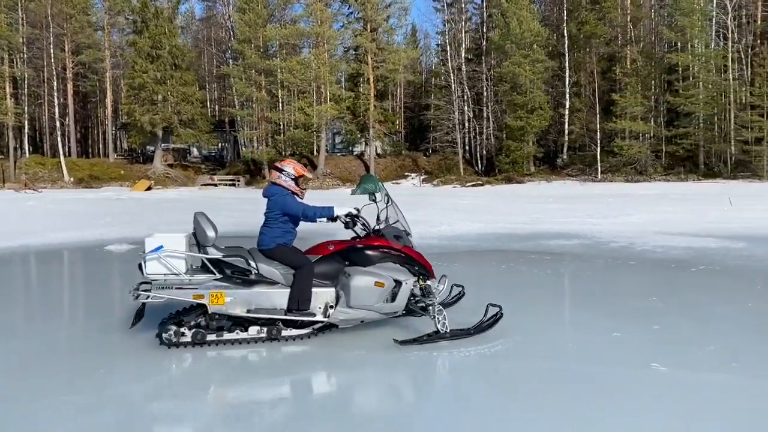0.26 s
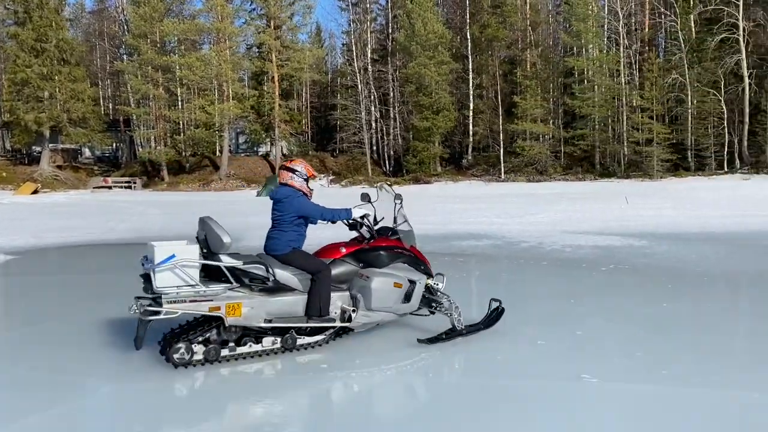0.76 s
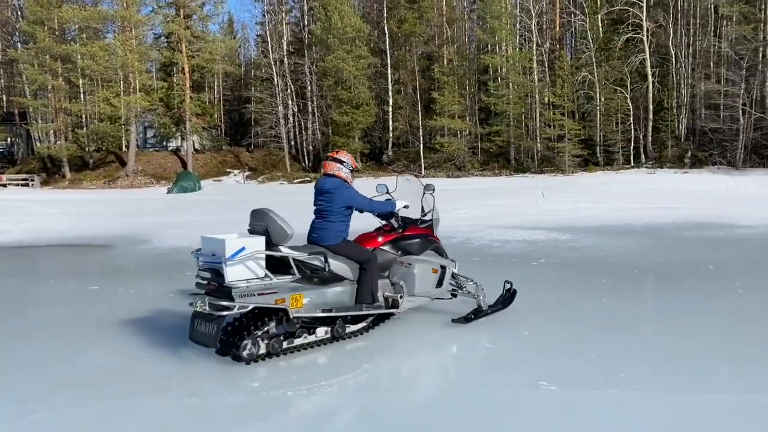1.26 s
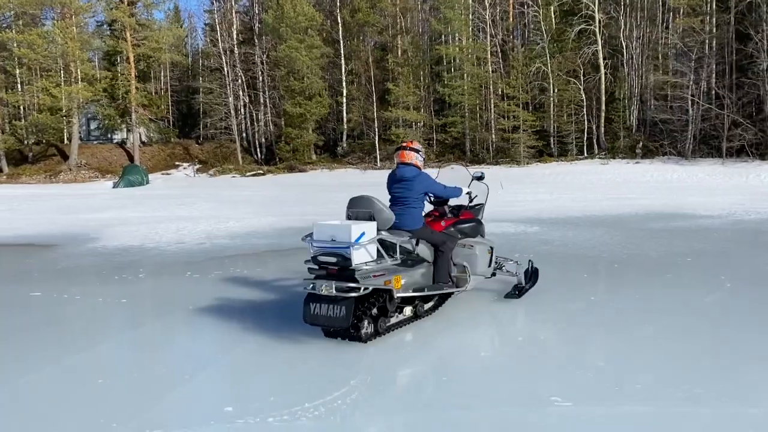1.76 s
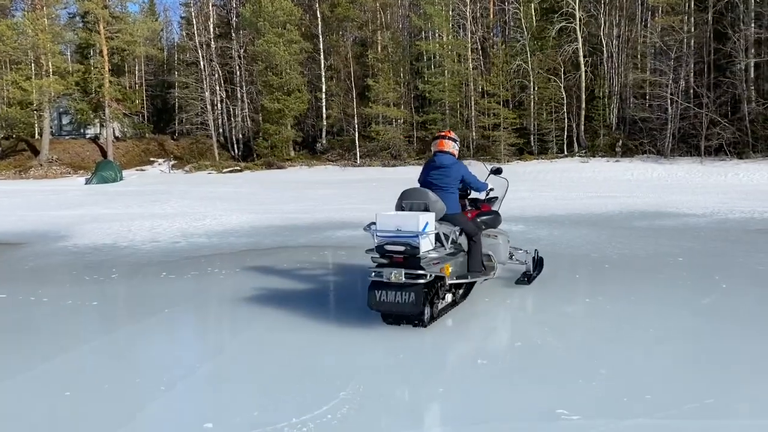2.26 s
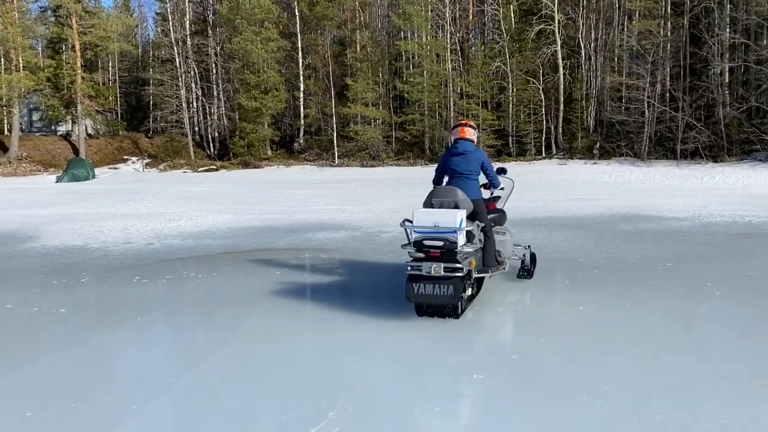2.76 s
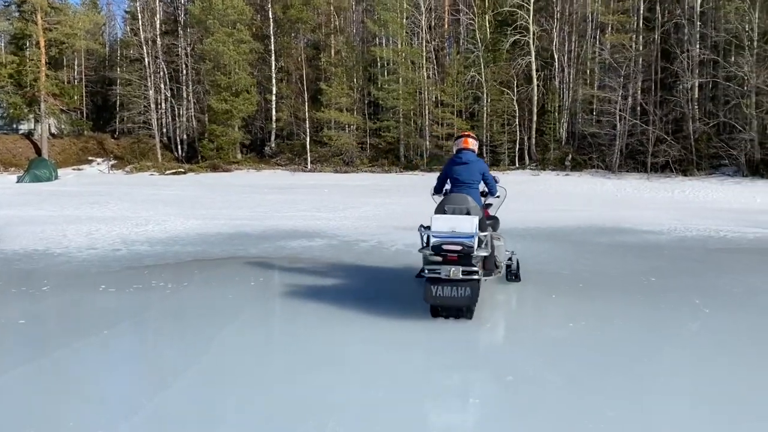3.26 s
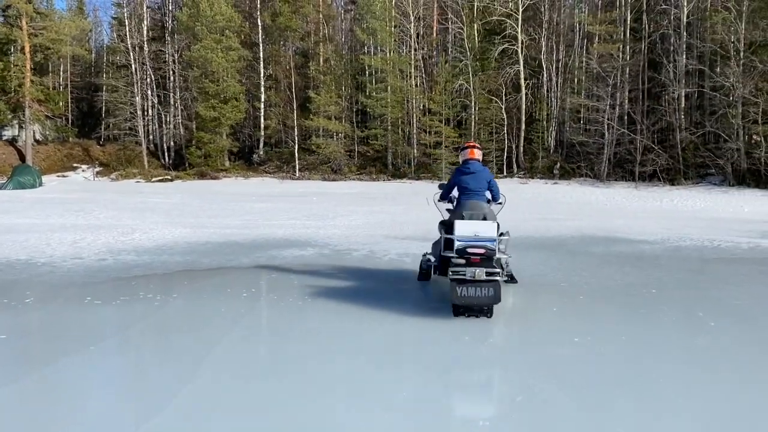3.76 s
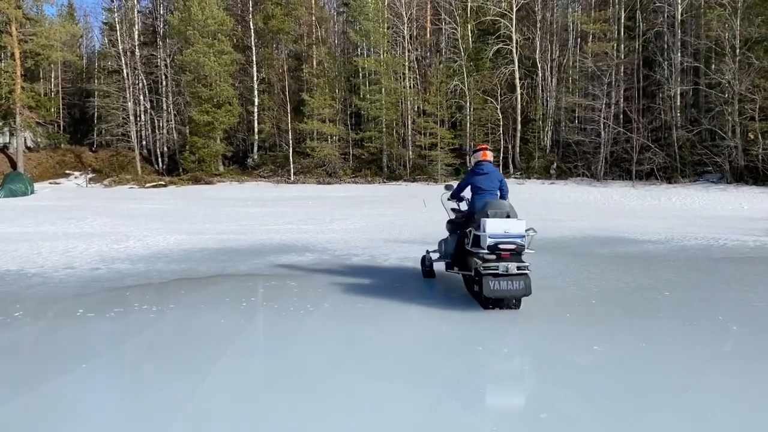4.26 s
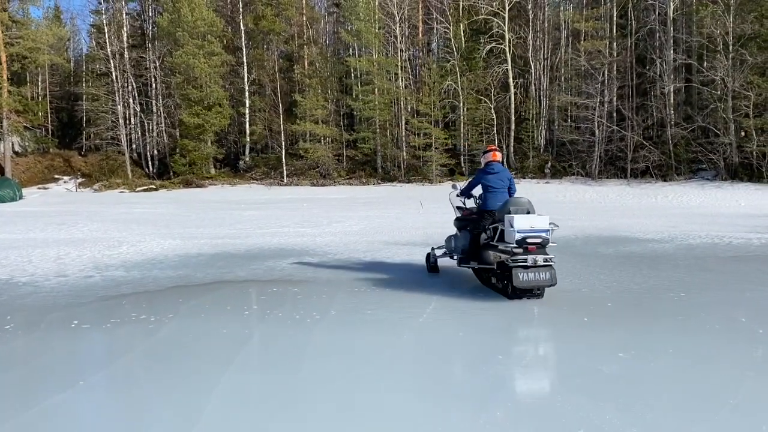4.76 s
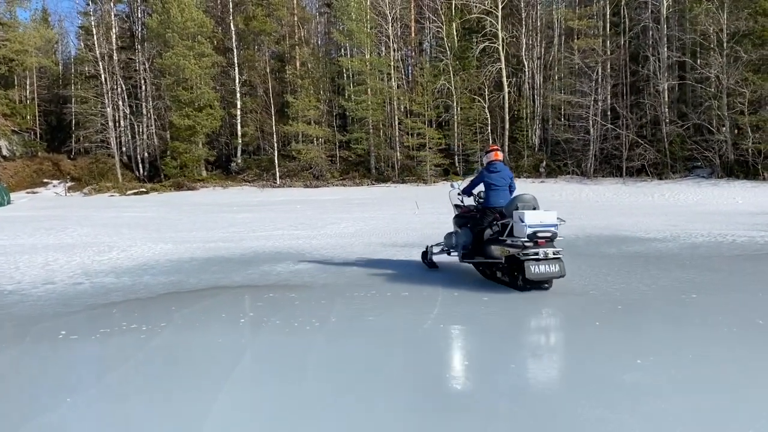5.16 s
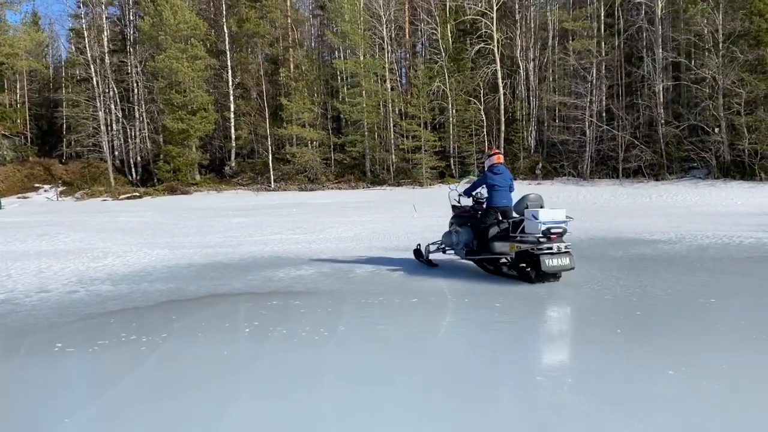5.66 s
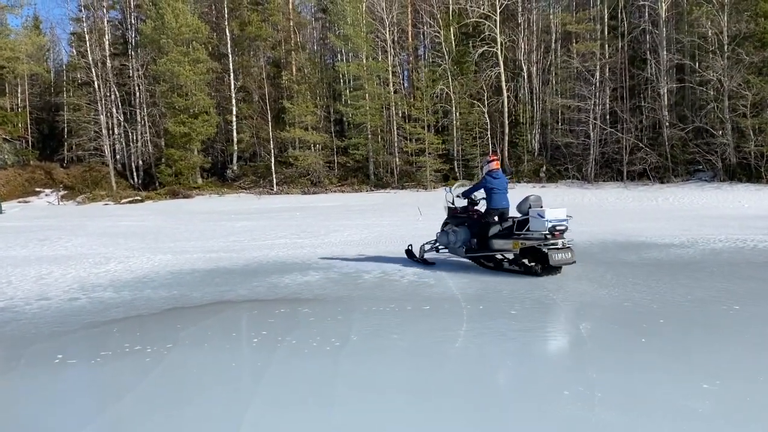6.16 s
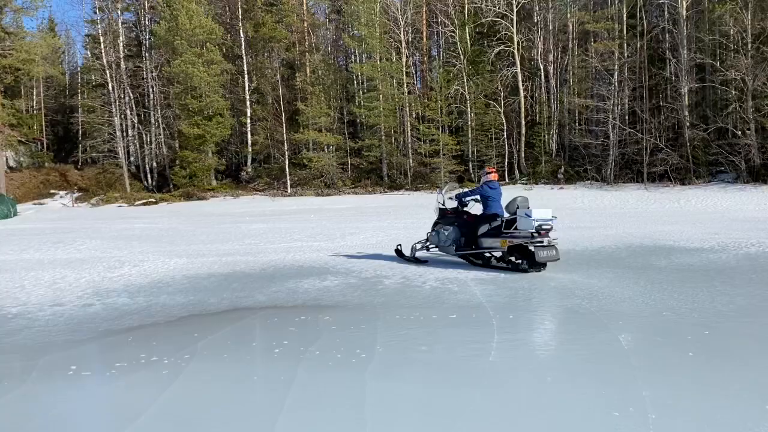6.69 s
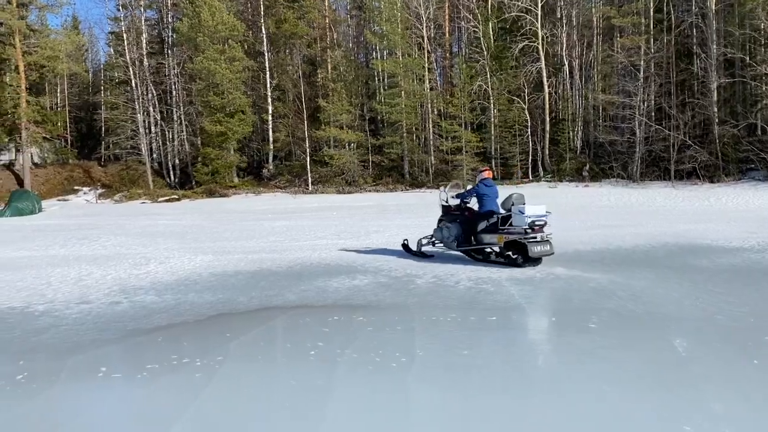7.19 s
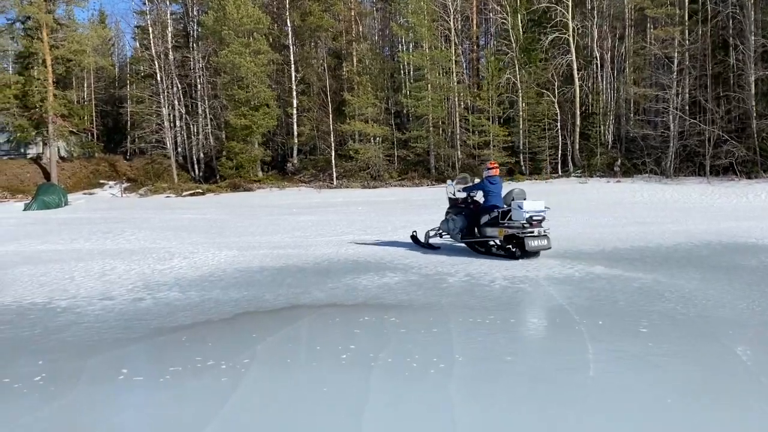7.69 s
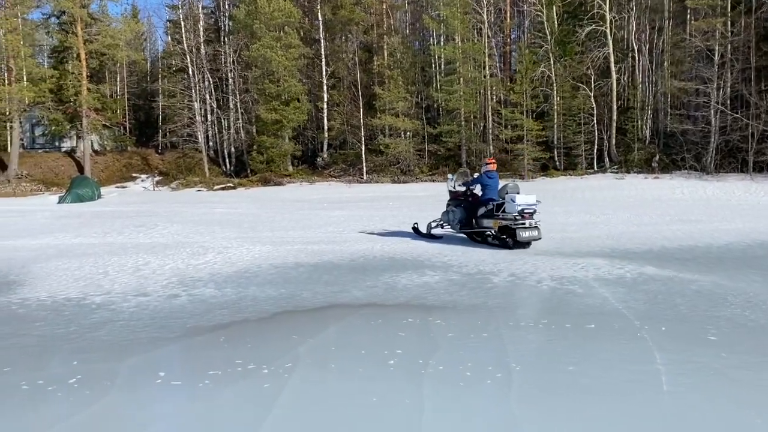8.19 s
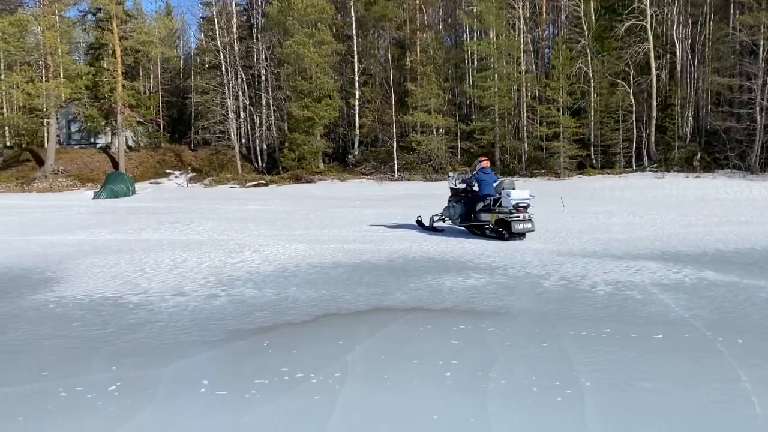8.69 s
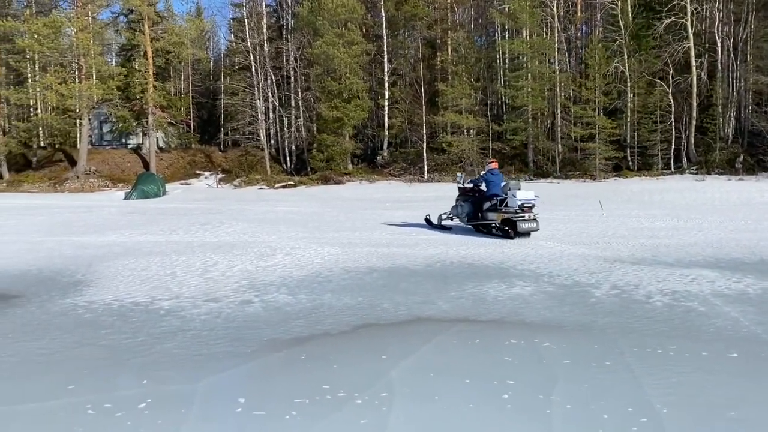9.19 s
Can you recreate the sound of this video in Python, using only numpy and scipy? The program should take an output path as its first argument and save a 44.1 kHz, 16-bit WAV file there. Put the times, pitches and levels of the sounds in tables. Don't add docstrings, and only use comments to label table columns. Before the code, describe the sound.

A snowmobile idles lumpily on lake ice, revs up, coasts down with a metallic clutch ring, revs again, then gives two short blips.

```python
import sys
import numpy as np
from scipy import signal
from scipy.fft import rfft, irfft, next_fast_len
from scipy.io import wavfile
from scipy.ndimage import uniform_filter1d, map_coordinates

SR = 44100
rng = np.random.default_rng(int(sys.argv[2]) if len(sys.argv) > 2 else 0)


def file_out(sig):
    cols = np.atleast_2d(sig).T
    lim = np.clip(cols, -1, 1)
    pcm = np.round(lim * 32767).astype(np.int16)
    wavfile.write(sys.argv[1], SR, pcm)


def voltage_ratio(level):
    return 10 ** (np.asarray(level, float) / 20)


N = 416304


def rms_one(x):
    return x / np.sqrt(np.mean(x ** 2) + 1e-20)


def in_time(rows):
    s, *columns = np.transpose(rows)
    return [np.interp(np.arange(N) / SR, s, c) for c in columns]


def by_speed(law, speed):
    rate, *columns = np.transpose(law)
    return np.array([np.interp(speed, rate, c) for c in columns])


def bumps(s, half_s, height):
    t = np.arange(N) / SR
    return sum(h * np.exp(-((t - at) / w) ** 2) for at, w, h in zip(s, half_s, height))


def at_hz(points, hz):
    f, value = np.transpose(points)
    return np.interp(np.log(hz + 1), np.log(f + 1), value)


def humps(peaks, hz):
    return sum(level_db / (1 + (2 * (hz - f) / width) ** 2) for f, width, level_db in peaks)


def shaped(x, response):
    size = next_fast_len(N + SR // 2)
    return irfft(rfft(x, size) * response(np.arange(size // 2 + 1) * SR / size), size)[..., :N]


def band(x, low_hz, high_hz, order=2):
    return signal.sosfilt(signal.butter(order, [low_hz, high_hz], "band", fs=SR, output="sos"), x)


def evened(x, span_s):
    return x / np.sqrt(uniform_filter1d(x ** 2, int(span_s * SR)) + 1e-12)


def drift(rate):
    knots = rng.standard_normal(int(N / SR * 100) + 2)
    return np.interp(np.arange(N) / SR * rate, np.arange(len(knots)), knots)


def ring(clicks, hz, t60):
    r, w = voltage_ratio(-60 / (t60 * SR)), 2 * np.pi * hz / SR
    return signal.lfilter([0, np.sin(w)], [1, -2 * r * np.cos(w), r * r], clicks + 1e-18)


# pitch_hz [Hz], level_db [dB per Hz]
WIND = [(25, -12), (50, -4), (75, 18), (105, 13), (150, 10.5), (210, 16), (290, -20), (350, -16),
        (600, -48)]


def gusts():
    noise = shaped(rng.standard_normal(N), lambda hz: voltage_ratio(at_hz(WIND, hz)))
    return evened(noise * voltage_ratio(3.3 * drift(12)), 0.33)


# start_s [s], level_db [dB]
SIDEWAYS = [(0, -28), (.6, -32), (1.2, -53), (2.6, -77), (3.6, -51), (4.0, -30), (4.6, -38), (5.3, -28),
            (5.85, -35), (6.3, -29), (7.2, -27), (7.6, -33.5), (8.2, -32), (8.75, -25), (9.44, -29)]
# start_s [s], share [0-1]
BREEZE = [(0, .15), (3.4, .2), (4.2, .6), (5.2, .85), (9.44, .9)]


def sideways(pipe):
    share, level = in_time(BREEZE)[0], voltage_ratio(in_time(SIDEWAYS)[0])
    quarter_turn = evened(shaped(pipe, lambda hz: 1j + 0 * hz), .3)
    aside = np.sqrt(1 - share ** 2) * quarter_turn
    common_wind = level * share * voltage_ratio(-3.0) * gusts()
    return common_wind + level * (share * gusts() + aside) * [[1], [-1]]


# pitch_hz [Hz], level_db [dB]
DIFFUSE = [(40, -7), (90, -16), (200, -20), (400, -9), (700, -12), (1200, -20), (3000, -11), (8000, -7),
           (13000, -6), (14800, -14)]


def tree_line_echo(x):
    t, t60 = np.arange(int(.3 * SR)) / SR, .3
    spray = rng.standard_normal(len(t)) * voltage_ratio(-60 * t / t60)
    scattered = signal.fftconvolve(x, spray / np.sqrt(np.sum(spray ** 2)))[:N]
    return shaped(scattered, lambda hz: voltage_ratio(at_hz(DIFFUSE, hz)))


# start_s [s],
# level_db [peak dB]
TICKS = [(0.5397, -56), (0.5945, -54), (0.8255, -46), (0.9632, -50), (1.3498, -56), (1.4481, -55),
         (1.4865, -45), (1.8108, -56), (2.1425, -56), (2.3161, -61), (2.7876, -58), (3.0864, -57),
         (3.1652, -42), (3.2221, -50), (5.7149, -51), (5.8611, -47), (5.8895, -42), (5.9249, -52),
         (6.2347, -50), (8.326, -39), (8.6986, -46), (8.8932, -43), (9.0748, -50)]


def ticks():
    out, t = np.zeros(N), np.arange(int(.03 * SR)) / SR
    for (s, level_db), noise in zip(TICKS, rng.standard_normal((len(TICKS), len(t)))):
        at = round(s * SR)
        out[at:at + len(t)] += voltage_ratio(level_db - 2) * noise * np.exp(-t / 0.0044)
    return band(out, 3500, 13000)


# start_s [s], level_db [peak dB], pitch_hz [Hz]
KNOCKS = [(0.012, -34, 686), (0.084, -37, 810), (0.203, -33, 600), (0.258, -30.5, 710), (0.615, -35, 865),
          (0.363, -30.5, 694), (0.466, -39, 700), (0.79, -33, 914), (1.147, -33.5, 830), (1.36, -35, 900),
          (1.407, -25.5, 862), (1.489, -35, 1445), (1.497, -28, 794), (1.819, -36.5, 860),
          (2.082, -35, 804), (2.37, -24, 753), (2.39, -31, 860), (2.413, -29, 800), (2.428, -40, 870),
          (2.796, -37.5, 794), (3.148, -44, 920), (3.302, -39, 720), (4.088, -48, 497), (4.396, -45, 666),
          (5.135, -23, 530), (5.988, -30, 730), (7.244, -28, 540), (8.508, -27, 676), (9.346, -23, 750),
          (8.549, -31, 720), (8.735, -48, 673)]


def knocks():
    out, t = np.zeros(N), np.arange(int(.04 * SR)) / SR
    for s, level_db, hz in KNOCKS:
        tone = .7 * np.sin(2 * np.pi * hz * t) * np.exp(-t / .014)
        puff = 2.0 * rng.standard_normal(len(t)) * np.exp(-t / .009)
        knock = (tone + puff) * (1 - np.exp(-t / .001))
        at = round(s * SR)
        out[at:at + len(t)] += voltage_ratio(level_db - 2.5) * knock[:N - at]
    return band(out, 500, 2000, order=3)


# start_s [s], level_db [peak dB]
CLUTCH_HITS = [
    (5.861, -42),
    (5.89, -41.5),
    (5.9249, -46),
]
# pitch_hz [Hz], level_db [dB], t60_s [s]
CLUTCH = [(4250, -1, 0.063), (4800, -6, 0.055), (6260, -15, 0.075), (7400, -12, 0.063), (8880, -12, 0.041),
          (10300, -16, 0.061), (11460, -28, 0.056)]
# start_s [s], pitch_hz [Hz], level_db [dB]
SQUEAL = [(3.25, 3900, -75), (3.36, 4200, -58), (3.55, 4620, -55), (3.68, 4450, -58), (3.8, 4200, -75),
          (5.6, 4800, -66), (5.72, 4700, -47.5), (5.85, 4400, -46), (5.93, 4000, -47), (6.0, 3750, -51),
          (6.05, 3700, -70), (6.9, 4650, -70), (7.3, 4700, -55), (8.0, 4620, -52), (8.4, 4650, -57),
          (8.7, 4800, -53), (8.9, 4750, -60), (9.0, 4700, -75)]


def clutch():
    out = np.zeros(N)
    hit_s, hit_db = np.transpose(CLUTCH_HITS)
    at = np.round(hit_s * SR).astype(int)
    for hz, level_db, t60 in CLUTCH:
        clicks = np.zeros(N)
        clicks[at] = voltage_ratio(hit_db + level_db + 6 + rng.normal(0, 1.3, len(at)))
        out += ring(clicks, hz, t60)
    hz, level_db = in_time(SQUEAL)
    width = rms_one(signal.lfilter([1], [1, -.97], rng.standard_normal(N)))
    return out + voltage_ratio(level_db) * width * np.sin(2 * np.pi * np.cumsum(hz) / SR)


# start_s [s, centre], half_s [s], level_db [dB]
JOLTS = [
    (1.378, 0.045, 8),
    (3.94, 0.13, 13),
    (5.6, 0.29, 9.5),
]
SHAKE_FADE_DB_PER_S, FADE_FROM_S = -2, 3.5


def shake(cycles, speed, level_db):
    clean = np.clip((speed - 36) / 14, 0, .9)
    hum = np.sqrt(2) * np.sin(2 * np.pi * cycles) * voltage_ratio(0.72 * drift(1.7))
    rumble = rms_one(band(rng.standard_normal(N), 42.0, 108.4))
    fade_db = SHAKE_FADE_DB_PER_S * np.maximum(np.arange(N) / SR - FADE_FROM_S, 0)
    level = voltage_ratio(level_db + fade_db + bumps(*np.transpose(JOLTS)))
    return level * (clean * hum + np.sqrt(1 - clean ** 2) * rumble)


# start_s [s, centre], half_s [s], pitch_hz [Hz], level_db [dB]
BUZZES = [(.05, 0.091, 1200, 9), (0.084, 0.068, 830, 8), (0.21, 0.065, 600, 10), (0.303, 0.17, 720, 10.5),
          (.18, 0.051, 1340, 8), (0.14, 0.23, 6400, 16), (0.636, 0.031, 900, 13), (.76, 0.036, 470, 10),
          (0.99, 0.49, 825, 7), (1.8, 1.7, 2470, 6.5), (2.04, 0.87, 1290, 11.5), (2.5, 1.1, 1670, 8),
          (2.6, .5, 3740, 8), (3.2, 0.11, 3800, 10), (3.65, 0.17, 5300, 12), (3.9, 0.11, 400, 5),
          (6.5, .15, 600, -6), (6.85, 0.11, 500, 5), (.5, 0.12, 540, 6), (3.46, 0.16, 410, -5),
          (3.75, 0.24, 4470, 14), (3.884, 0.04, 560, 10.5), (4.122, 0.14, 485, 13.5),
          (4.476, 0.084, 1680, 11.5), (5.07, 0.3, 516, 11), (5.645, .08, 440, 7), (6.3, 0.29, 990, -13),
          (6.396, 0.078, 470, 6.5), (5.4, 0.11, 430, 2), (6, 0.15, 400, 12), (8.1, 0.11, 570, 6.5),
          (7.15, .1, 640, 11.5), (7.907, 0.11, 690, 9), (8.5, 0.35, 2550, 0), (8.7, 0.6, 4050, 9),
          (8.698, 0.21, 4800, 16), (8.9, 0.05, 475, 7), (9.4, 0.062, 490, 13), (7.3, 0.22, 480, -4),
          (7.9, 0.29, 10420, 14), (7.3, .6, 4650, 5.5), (4.85, 0.22, 790, 5), (8.05, 0.13, 1100, 2),
          (6.1, 0.14, 1130, 5), (7.9, 0.044, 480, 1), (1.53, .04, 850, 14), (2.12, .02, 780, 12),
          (0.2, 0.089, 2050, 13), (.78, .05, 390, 14), (0.92, .03, 1630, 11)]
BUZZ_WIDTH_HZ = 89
TUNNEL_HZ, TUNNEL_IDLE_HZ, TUNNEL_WANDER_HZ = 450, 171, 114
BELT_HZ, BELT_SLACK_HZ = 4060, 480


def turning(x, speed, overrun):
    hz, s, frames = signal.stft(x, SR, nperseg=1024)
    at = np.minimum((s * SR).astype(int), N - 1)
    idling = np.clip((16 - speed) / 4, 0, 1)
    tunnel_hz = (TUNNEL_HZ + idling * (TUNNEL_IDLE_HZ + TUNNEL_WANDER_HZ * drift(3.1)))[at]
    belt_hz = (BELT_HZ + BELT_SLACK_HZ * overrun)[at]
    field = rng.standard_normal((90, 60))
    place = np.meshgrid(11 * np.log2(np.minimum(hz, 11000) / 150 + 1), s * 4, indexing="ij")
    hz = hz[:, None]
    patchy_db = 2.2 - .4 * (hz > 2000)
    gain_db = patchy_db * map_coordinates(field, place, order=1)
    gain_db = gain_db + humps([(tunnel_hz, 100, 2.5), (belt_hz, 300, 5)], hz)
    for when, half_s, buzz_hz, buzz_db in BUZZES:
        swell = np.exp(-((s - when) / half_s) ** 2)
        gain_db = gain_db + humps([(buzz_hz, BUZZ_WIDTH_HZ, buzz_db)], hz) * swell
    return signal.istft(frames * voltage_ratio(gain_db), SR, nperseg=1024)[1][:N]


# speed [cycles per s], growl_db [dB], clatter_db [dB], hiss_db [dB]
WORKS = [(10.8, -52.5, -52, -59.5), (19.2, -42.5, -49, -56.5), (30.8, -40.5, -46.5, -53.5),
         (40.5, -33, -41.5, -50), (57.3, -29.5, -35, -43.5)]
# pitch_hz [Hz], level_db [dB per Hz]
WORKS_COLOUR = [(190, 6), (330, 1.0), (372, -13.0), (466, -10.0), (1400, -18.0), (1670, -14.5),
                (2630, -25.5), (2960, -40.5), (4720, -26.5), (6580, -40.0), (7530, -33.0), (12000, -42.5),
                (15600, -72), (22000, -120)][:-2] + [(14000, -42), (14800, -43), (16000, -56.0)]
# pitch_hz [Hz], width_hz [Hz], level_db [dB]
PANELS = [(451, 87, 3), (722, 240, 5.5), (1644, 46, 2.5), (3100, 545, 12.5), (3760, 160, 9), (5220, 290, 6),
          (6760, 420, 7), (7940, 540, -5), (9700, 290, -2.5), (3210, 90, 3.5), (3540, 60, 4.5),
          (7200, 81, 1.5), (10420, 70, 2), (6480, 64, -1), (6950, 60, -6), (8120, 70, -9), (8900, 58, 1),
          (2504, 15, 7), (1266, 50, 3.5)]
# start_s [s], level_db [dB]
FACING = [(0, 18), (.45, 4), (.75, 6.5), (1.5, 4.5), (2.0, 1), (3.1, 1.5), (3.75, -1), (4.2, -0.5),
          (6.5, 2), (7.2, 1.5), (8.0, 3), (8.35, 2), (8.8, 8), (9.1, 0.5), (9.35, 6.5)]
FACING_SHARE = [1, 0.61, 0.59]
OVERRUN_DB = [2.5, 2, 1.5]
SURGE_DB = [5.5, 9.5, 14.5]
SURGE_PER_S = 6.2
STEADY_ABOVE_DB = 4


def works(cycles, speed, overrun):
    heights = voltage_ratio(2.4 * np.minimum(rng.exponential(1, N), 4)) * rng.choice([-1, 1], N)
    fine_ticks = (rng.random(N) < 900 / SR) * heights
    source = rng.standard_normal(N) + 0.28 * rms_one(fine_ticks)
    panelled = shaped(source, lambda hz: voltage_ratio(at_hz(WORKS_COLOUR, hz) + humps(PANELS, hz)))
    coloured = turning(panelled, speed, overrun)
    facing_db, = in_time(FACING)
    surge = np.tanh(np.maximum(np.gradient(speed) * SR / speed, 0) / SURGE_PER_S)
    levels_db = by_speed(WORKS, speed) + np.outer(SURGE_DB, uniform_filter1d(surge, int(.1 * SR)))
    levels_db = levels_db + np.outer(FACING_SHARE, facing_db) + np.outer(OVERRUN_DB, overrun)
    per_cycle = np.interp(cycles, np.arange(400), rng.standard_normal(400))
    wash = voltage_ratio(-np.maximum(facing_db - STEADY_ABOVE_DB, 0))
    out, shared = 0, drift(25)
    layers = [(330, 1000, 2.8), (1000, 3000, 4.6), (3000, 17000, 5.0)]
    for level_db, (low_hz, high_hz, swell_db) in zip(levels_db, layers):
        depth_db = swell_db * (10.5 / speed) ** .6 * wash
        swell = depth_db * (np.cos(2 * np.pi * (cycles + 0.26)) + 0.5 * per_cycle)
        swell = swell + 0.27 * shared + 0.16 * drift(14)
        if low_hz < 1000:
            swell = swell + 2.0 * np.cos(2 * np.pi * (4 * cycles + .5))
        out = out + voltage_ratio(level_db) * evened(band(coloured, low_hz, high_hz, order=3) * voltage_ratio(swell), 0.25)
    return out


# start_s [s], speed [cycles per s]
SPEED = [(3.08, 10.65), (3.27, 14.6), (3.46, 30.0), (3.6, 32.0), (3.82, 26.3), (4.0, 33.5), (4.3, 46.3),
         (4.47, 53.6), (4.75, 59.3), (4.96, 56.5), (5.27, 42.0), (5.55, 31.5), (5.8, 24.1), (6.03, 17.6),
         (6.12, 19.5), (6.2, 25.0), (6.29, 28.5), (6.58, 30.8), (7.05, 44.8), (7.2, 48.1), (7.92, 57.6),
         (8.25, 41.6), (8.58, 29.0), (8.7, 27.0), (8.96, 26.8), (9.22, 20.8), (9.44, 28.8)]
# start_s [s, centre], half_s [s], change [cycles per s]
HUNTING = [
    (2.25, .17, -.42),
    (2.72, .15, .47),
]
# start_s [s], end_s [s], squeeze of the pulse gap under load [share of a cycle]
THROTTLE = [
    (3.1, 5.0, .02),
    (6.0, 6.4, .004),
    (6.4, 7.97, .04),
    (8.72, 8.95, 0),
    (9.15, 9.6, .01),
]
IDLE_FROM = 10.08
FLYWHEEL_S, THROTTLE_EASE_S = .1, .08


def controls():
    t = np.arange(N) / SR
    asked = in_time([(0, IDLE_FROM)] + SPEED)[0] + bumps(*np.transpose(HUNTING))
    speed = uniform_filter1d(asked, int(FLYWHEEL_S * SR), mode="nearest")
    eased = lambda x: uniform_filter1d(x, int(THROTTLE_EASE_S * SR), mode="nearest")
    throttle = eased(sum(1. * (t > a) * (t < b) for a, b, load in THROTTLE))
    squeeze = eased(sum(load * (t > a) * (t < b) for a, b, load in THROTTLE))
    overrun = (1 - throttle) * np.clip((speed - 14) / 14, 0, 1)
    return speed, throttle, overrun, squeeze


GAP_IDLE, GAP_OVERRUN = 0.2338, 0.039
GAP_SHRINK, LOAD_FROM = 0.0027, 41.1
SQUEEZES_BELOW = 45.7
WIDENS_BELOW, WIDENS_OVER = 57.8, 23.2


def pulse_gap(speed, throttle, overrun, squeeze):
    loaded = squeeze * np.clip((SQUEEZES_BELOW - speed) / WIDENS_OVER, 0, 1)
    coasting = GAP_OVERRUN * overrun * np.clip((WIDENS_BELOW - speed) / WIDENS_OVER, 0, 1)
    shrinking = GAP_SHRINK * throttle * np.maximum(speed - LOAD_FROM, 0)
    return GAP_IDLE - loaded + coasting - shrinking


STRETCH_RAD = 1.8


def stretched(x, cycles):
    steps = 128
    angle = np.arange(cycles[0], cycles[-1], 1 / steps)
    size = next_fast_len(len(angle) + 4 * steps)
    order = np.arange(size // 2 + 1) * steps / size - 4.5
    inner = np.clip(order, -2.5, 2.5)
    bend = np.exp(1j * STRETCH_RAD * inner * (order - inner / 2))
    bent = irfft(rfft(np.interp(angle, cycles, x), size) * bend, size)
    return np.interp(cycles, angle, bent[:len(angle)])


REFLECTION_LOAD_DB = 4


def firing(cycles, spacing, uneven, throttle):
    turn = np.arange(np.ceil(cycles[0]), cycles[-1] + 1)
    here = np.interp(turn, cycles, np.arange(N)).astype(int)
    gap, rough = spacing[here], np.clip(uneven[here], 0, 1)
    pulses, chance = np.zeros(N), rng.standard_normal((len(turn), 6))
    for k, (place, level_db) in enumerate([(-.5, -1.5), (.5, 0.1), (1.45, -12.0)]):
        when = turn - .035 + place * gap + 0.041 * rough * chance[:, k]
        at = np.interp(when, cycles, np.arange(N), left=N, right=N).astype(int)
        load_db = (k == 2) * REFLECTION_LOAD_DB * throttle[here]
        height = voltage_ratio(level_db + load_db + 5.3 * rough * chance[:, 3 + k])
        pulses[at[at < N]] += height[at < N]
    turbulence = 0.024 * uneven * rng.standard_normal(N)
    return pulses + turbulence * voltage_ratio(8.2 * np.cos(2 * np.pi * cycles))


# pitch_hz [Hz], level_db [dB]
SILENCER = [(30, -40), (60, -8), (90, 6.5), (125, 5), (170, 4), (210, 0), (260, 0.5), (295, -1.5),
            (320, -12.5), (380, -53), (600, -56.5)]
# pitch_hz [Hz], width_hz [Hz], level_db [dB]
CHAMBERS = [(94.4, 120, 7), (117, 6.1, 1.5), (167, 73, 3.5), (253.6, 30, 3), (284, 112, 3)]


def silencer(pulses):
    lag_s, lead_s, top_hz = .016, .014, 330

    def pipe(hz):
        low_hz = np.minimum(hz, top_hz)
        turns = lag_s * (low_hz - low_hz ** 2 / (2 * top_hz)) - lead_s * hz
        return voltage_ratio(at_hz(SILENCER, hz) + humps(CHAMBERS, hz)) * np.exp(-2j * np.pi * turns)

    upper = lambda hz: 1 / (1 + (180 / (hz + 1)) ** 6)
    boom = evened(shaped(pulses, lambda hz: pipe(hz) * (1 - upper(hz))), 0.34)
    bark = evened(shaped(pulses, lambda hz: pipe(hz) * upper(hz)), 0.316)
    return boom, bark


# start_s [s, centre], half_s [s], level_db [dB], extra unevenness [0-1]
STUMBLES = [
    (5.88, 0.096, -8.5, 0.34),
    (8.612, 0.04, -7, 0.5),
    (8.731, 0.01, -14, 0),
    (9.04, 0.09, -11, 0.46),
]
# start_s [s], level_db [dB]
EFFORT = [(0, -30.5), (.7, -28.5), (3.06, -29), (3.2, -21.5), (3.33, -20), (3.75, -27.5), (3.9, -23.5),
          (4.3, -27), (4.9, -26), (5.15, -25), (5.74, -28.5), (6.0, -26.5), (6.13, -25.5), (6.55, -30.5),
          (7.3, -25), (7.97, -24), (8.5, -27), (8.68, -25.5), (8.93, -24.5), (9.17, -29.5), (9.27, -25),
          (9.44, -20)]
UNEVEN, STEADIES = 0.38, .7
STRETCH_FROM = 22
RASP_SCATTER = .9


def exhaust(cycles, spacing, boom_db, bark_db, rasp, throttle):
    s, half_s, loss_db, extra = np.transpose(STUMBLES)
    speed = np.gradient(cycles) * SR
    uneven = UNEVEN * (IDLE_FROM / speed) ** STEADIES + bumps(s, half_s, extra)
    effort_db = in_time(EFFORT)[0] + bumps(s, half_s, loss_db)
    pulses = firing(cycles, spacing, uneven, throttle)
    boom, bark = silencer(pulses)
    note = voltage_ratio(boom_db + effort_db) * boom + voltage_ratio(bark_db + effort_db) * bark
    load = throttle * np.clip((speed - STRETCH_FROM) / 5, 0, 1)
    loose_gas = uniform_filter1d(np.abs(pulses), size=150) * rng.standard_normal(N)
    leak = rms_one(pulses) + RASP_SCATTER * rms_one(loose_gas) * 2
    leak = rasp * evened(band(leak, 403, 548, order=4), 0.19)
    return (1 - load) * note + stretched(load * note, cycles) + leak


# speed [cycles per s], boom_db [dB], bark_db [dB], shake_db [dB]
OPEN = [(11, 3, -5.5, -39), (23.8, 0, -0.5, -38), (30.5, 3.5, -7.5, -36), (38.4, -3.5, 2, -32),
        (46.4, -6, -0.5, -27.5), (56.6, -5, 1.4, -27)]
# speed [cycles per s], boom_db [dB], bark_db [dB], shake_db [dB]
SHUT = [(11, 0, -7, -36.5), (28.4, 2.5, -7.5, -35), (37, -0.5, 1.5, -36), (45.5, -0.5, -0.5, -34),
        (56.3, 5, 3, -49)]
# pitch_hz [Hz], left lead [radians]
PORT_PHASE = [(0, 0), (1810, .2), (3010, 1.6), (4310, 0), (5170, 2), (5900, 0), (6630, -2.2), (7240, -1.8),
              (8790, 2.3), (10400, .1), (11800, 0), (12600, -1.95), (13200, -2.9), (13800, -3.4),
              (14300, -3.95), (14700, -6.28)]
# [left minus right, dB]
PORT_BALANCE = [(60, -2.8), (300, -2.5), (700, -2.3), (1500, -4), (2500, 0), (15000, 0)]
START_CYCLES = .70
BOOM_FADE_DB_PER_S = -0.5
RASP_DB = -9
RASP_BUZZ_SHARE, RASP_TOP_HZ = 0.86, 600


def scene():
    speed, throttle, overrun, squeeze = controls()
    cycles = START_CYCLES + np.cumsum(speed) / SR
    spacing = pulse_gap(speed, throttle, overrun, squeeze)
    boom_db, bark_db, shake_db = throttle * by_speed(OPEN, speed) + (1 - throttle) * by_speed(SHUT, speed)
    fade_s = np.maximum(np.arange(N) / SR - FADE_FROM_S, 0)
    fast = throttle * (speed > LOAD_FROM) * (speed - LOAD_FROM) / LOAD_FROM * 2
    boom_db = boom_db + BOOM_FADE_DB_PER_S * fade_s * fast
    low_buzzes = [(s, half_s, db) for s, half_s, hz, db in BUZZES if hz < RASP_TOP_HZ]
    buzz_db = bumps(*np.transpose(low_buzzes))
    rasp = throttle * voltage_ratio(RASP_DB + by_speed(WORKS, speed)[0] + RASP_BUZZ_SHARE * buzz_db)
    pipe = exhaust(cycles, spacing, boom_db, bark_db, rasp, throttle)
    machine = pipe + shake(cycles, speed, shake_db) + works(cycles, speed, overrun)
    machine = machine + knocks() + clutch() + ticks()
    port = lambda hz: voltage_ratio(at_hz(PORT_BALANCE, hz) / 2) * np.exp(.5j * at_hz(PORT_PHASE, hz))
    echo = tree_line_echo(machine)
    left = shaped(machine, port) + echo
    right = shaped(machine, lambda hz: 1 / port(hz)) - echo
    return np.array([left, right]) + sideways(pipe)


def roll_off(x):
    return signal.sosfilt(signal.butter(12, 16900, fs=SR, output="sos"), x)


def record(dry):
    rounded = 0.5 * np.tanh(dry / 0.57)
    mix = shaped(rounded, lambda hz: hz < 15800)
    return roll_off(mix)


dry = scene()
out = record(dry)
file_out(out)
```